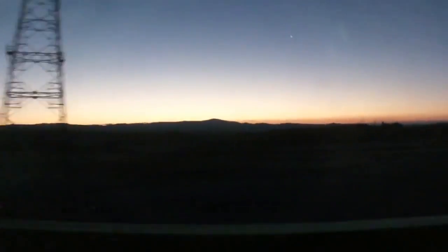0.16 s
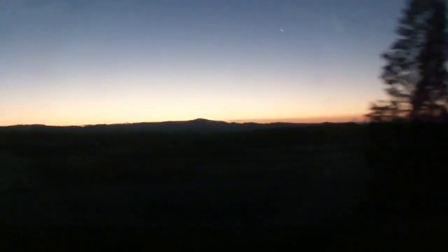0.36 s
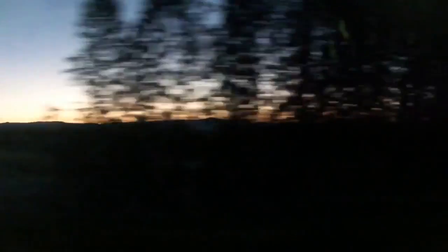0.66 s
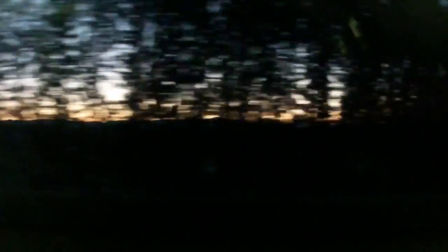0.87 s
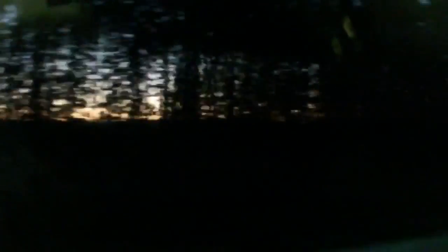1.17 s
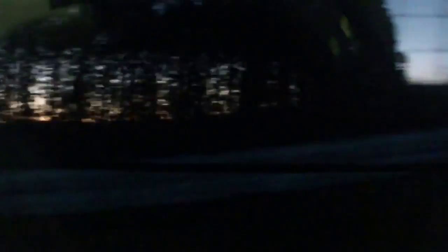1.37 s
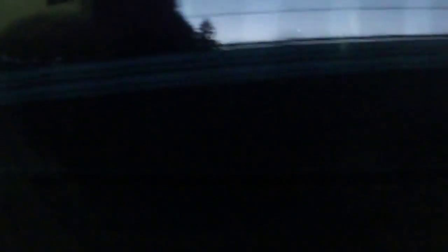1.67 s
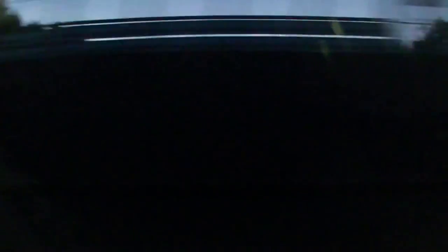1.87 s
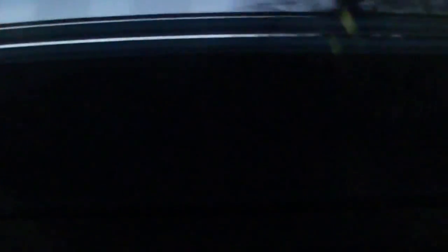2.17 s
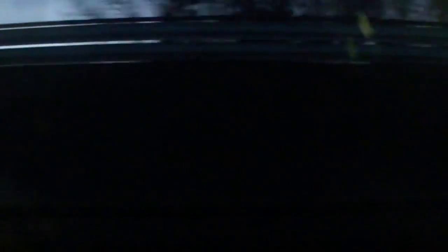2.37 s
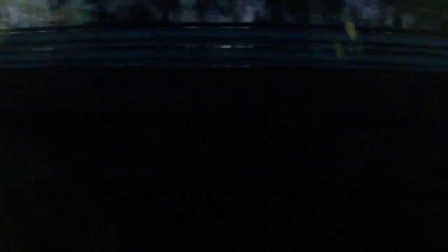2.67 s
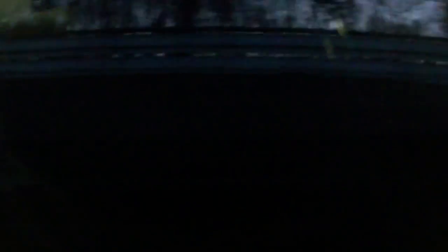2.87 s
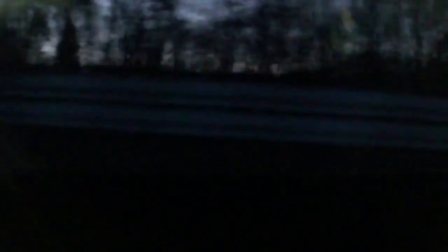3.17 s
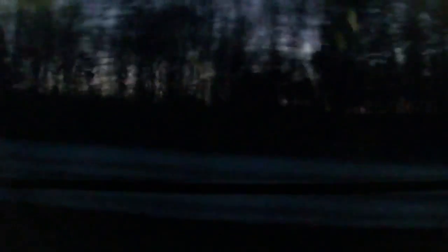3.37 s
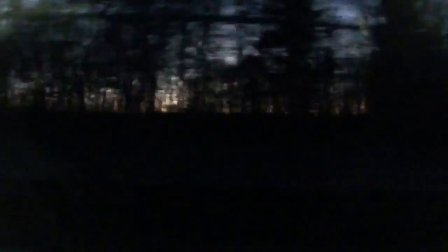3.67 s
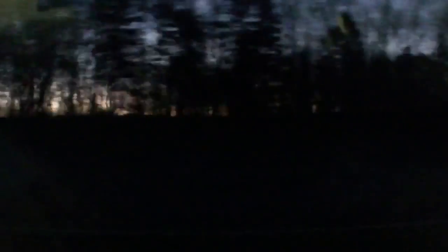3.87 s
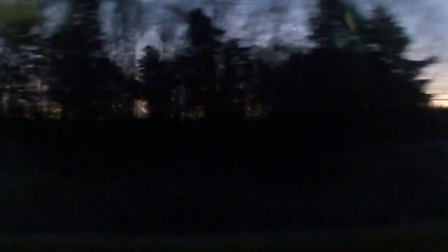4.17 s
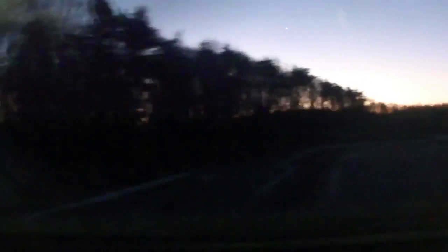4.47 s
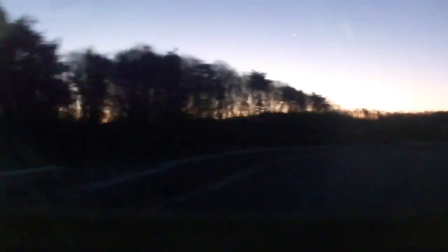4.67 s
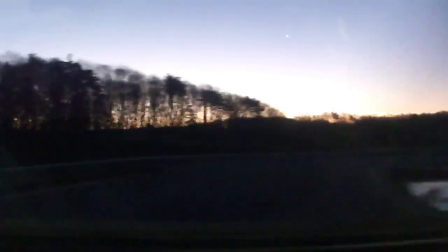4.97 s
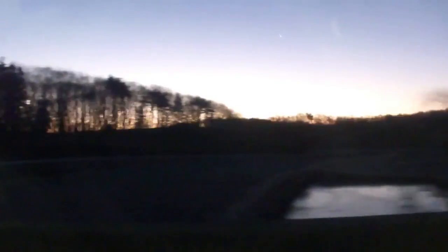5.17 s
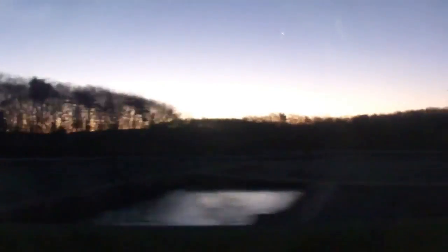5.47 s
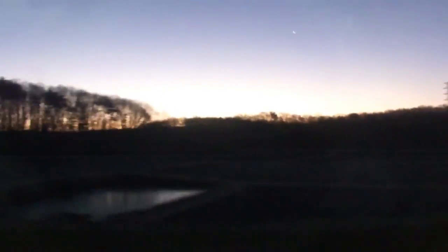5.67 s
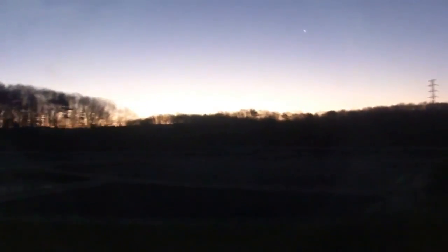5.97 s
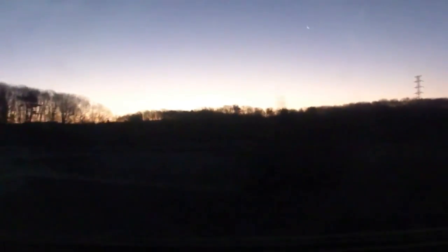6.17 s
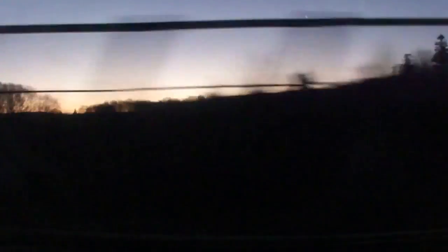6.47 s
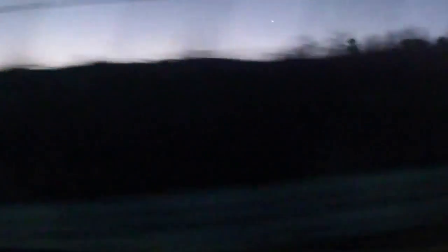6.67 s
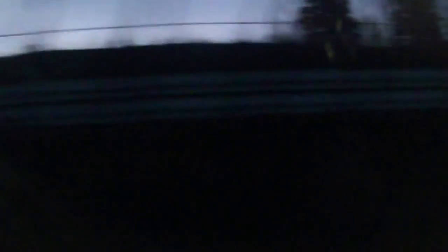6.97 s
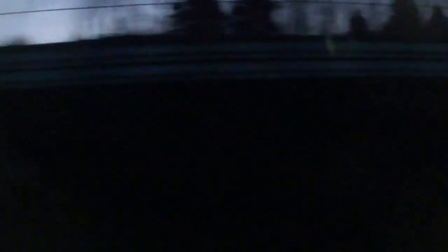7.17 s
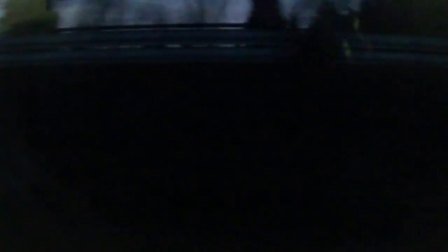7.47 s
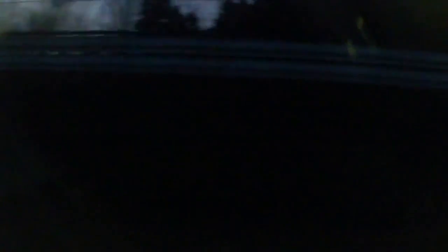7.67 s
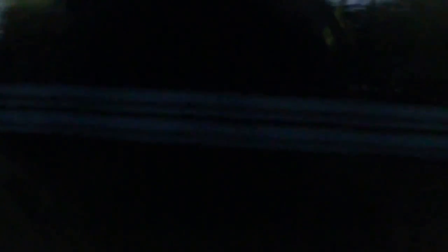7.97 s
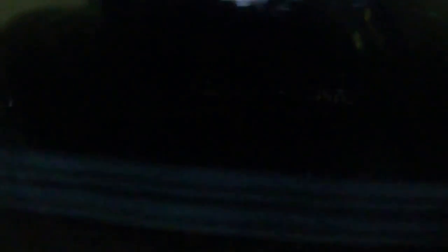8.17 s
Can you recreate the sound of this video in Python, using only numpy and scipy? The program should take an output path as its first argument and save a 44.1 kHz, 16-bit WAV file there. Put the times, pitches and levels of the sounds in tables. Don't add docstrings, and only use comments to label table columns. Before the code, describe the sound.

Inside a fast train carriage, close to the window. A dense, steady rumble fills the cabin, with muffled rail roar and slight whine above it and very faint air hiss. A mast swishes past at once, another soon after. A sharp plastic tap on the recorder case follows, then small rattles. Later the roar swells with several more mast swishes, a dull tick sounds, and the roar rises again.

```python
import sys
import numpy as np
from scipy import signal
from scipy.fft import rfft, irfft
from scipy.io import wavfile

SR = 44100
rng = np.random.default_rng(int(sys.argv[2]) if len(sys.argv) > 2 else 0)


def boost_factor(decibels):
    exponent = np.asarray(decibels, float) / 20
    return 10 ** exponent


def output_pcm(signal):
    pcm = np.clip(np.atleast_2d(signal).T, -1, 1) * 32767
    wavfile.write(sys.argv[1], SR, np.round(pcm).astype(np.int16))


N = 366471
HZ = np.fft.rfftfreq(N, 1 / SR) + 1e-3

# time_s, level_db
RAIL_ROUGHNESS = [(0.0, -35.5), (0.23, -37.5), (4.1, -39), (4.7, -35), (5.92, -34), (6.06, -35),
                  (6.69, -37.5), (7.41, -35), (8.01, -36), (8.31, -35.5)]
# frequency_hz, density_db (per Hz)
BODY_SPECTRUM = [(15, -86.5), (25, -51.5), (50, -24), (86, -17), (111, -9), (138, -7.5), (169, -4.5),
                 (272, -3.5), (306, -2), (359, -5.5), (652, -10), (721, -10.5), (1840, -18.5), (2240, -19),
                 (2900, -29.5), (3770, -54), (6380, -120)]
# frequency_hz, width_hz, lift_db
CABIN_MODES = [(124.5, 24.6, 6), (168.8, 11.7, 8), (226.6, 59, 4), (308.5, 18, 2), (466, 74, 3),
               (565, 26, 3), (719, 50, 2.5), (985, 44, 2.5)]
# frequency_hz, density_db (per Hz)
ROAR_SPECTRUM = [(700, -2.5), (1200, 4), (1600, -2), (1800, -5.5), (2050, -7), (2400, -9.5), (2600, -13.5),
                 (2790, -17.5), (2950, -31.5), (3300, -56.5), (4500, -100)]
# frequency_hz, density_db (per Hz)
ROAR_TOP_SPECTRUM = [(2700, -15.5), (3200, -1), (3600, -4.5), (4100, -11.5), (4600, -9.5), (5200, -20),
                     (6000, -38.5)]
# frequency_hz, width_hz, level_db
RAIL_MODES = [(2190, 110, 0), (2385, 110, -4), (1595, 80, -3)]
# frequency_hz, density_db (per Hz)
AIR_SPECTRUM = [(4000, -30.5), (4700, -6.5), (5600, 3), (6500, 2), (7900, -1), (8300, -5), (9500, -8),
                (10500, -13.5), (11300, -28.5), (13500, -36), (15000, -25.5), (15700, -15), (16000, -45)]
# centre_s, level_db, half_length_s
MASTS = [
    (0.048, -27.5, 0.039),
    (0.686, -32.5, 0.04),
    (1.998, -43, .03),
    (3.092, -43.5, 0.06),
    (4.626, -33.5, 0.12),
    (5.156, -28, 0.03),
    (5.732, -33, .06),
    (6.08, -43.5, 0.059),
]
# frequency_hz, density_db (per Hz)
MAST_SPECTRUM = [(700, -23), (1100, -5), (1700, -5), (2450, 3.5), (2900, -21.5), (3400, -15.5), (4500, -29),
                 (5500, -55)]
# start_s, peak_db
TAPS = [
    (1.231, -1.5),
]
# frequency_hz, left_db, right_db, t60_s
CASE_MODES = [(1640, -11.5, -22, 0.026), (2080, -15.5, -19.5, 0.015), (6170, -8, -13.5, 0.0024),
              (7000, -2, -11.5, 0.0048), (7940, -2, -1.5, 0.0025), (8900, -3.5, -15.5, .0045),
              (10300, -5.5, -16, 0.0032), (15600, -23, -20.5, .004)]
# start_s, peak_db, centre_hz
RATTLE_EVENTS = [(.155, -47, 6300), (.3015, -44, 6300), (.9292, -42, 6700), (1.2306, -33.5, 7800),
                 (1.2316, -22, 1300), (1.566, -34.5, 7400), (1.99, -48, 6800), (2.005, -48, 7600),
                 (2.36, -48, 7000), (3.6, -47.5, 8000), (4.18, -52, 6200), (4.258, -47, 8000),
                 (4.315, -33, 8540), (4.3172, -25.5, 6600), (4.3173, -22.5, 2000), (4.669, -38.5, 7700),
                 (4.867, -45.5, 7950), (4.879, -47, 7500), (5.9622, -41.5, 7950), (6.885, -44.5, 7100),
                 (6.93, -47, 7000)]
# start_s, peak_db, dullness (0-1)
TICK_EVENTS = [
    (.584, -48, .1),
    (.738, -45, .1),
    (1.2278, -38, .1),
    (1.4075, -44, .1),
    (1.9327, -44, .1),
    (2.162, -44, .1),
    (2.3268, -44, .1),
    (4.8093, -34, .1),
    (6.5096, -43, .1),
    (6.6938, -22, .85),
]
# frequency_hz, likeness (0-1)
CAPSULE_LIKENESS = [(30, 1), (125, 0.99), (250, 1), (500, 0.97), (1000, 0.93), (2000, 0.8), (3000, 0.61),
                    (5000, 0.62), (9000, 0.14), (12000, 0.1), (15500, .3)]
# frequency_hz, width_hz
GRILLE_DIPS = [(12000, 2800), (13700, 2800)]
# frequency_hz, width_hz
RECORDER_NOTCHES = [(3000, 267), (4000, 570), (5000, 840)]

SMOOTH_RAIL_DB, ROAR_LIFT_DB = -38, 2.0
RUMBLE_DB, RUMBLE_FOLLOWS = -22, 0.14
ROLLING_DB, ROLLING_FOLLOWS = -24.5, 0.56
HISS_DB, HISS_FOLLOWS = -56.5, 0.13
MAST_HISS_DB, MAST_HISS_TOP_HZ = -22.5, 7500
RATTLE_T60_S = 0.032
LEFT_DB = -0.55
CLOCK_HZ, CLOCK_DB = 8000, -76


def rms_one(x):
    return x / np.sqrt(np.mean(x ** 2) + 1e-20)


def at_hz(points):
    hz, db = np.array(points).T[:2]
    return np.interp(np.log(HZ), np.log(hz), db)


def hump(hz, width_hz):
    return 1 / (1 + (2 * (HZ - hz) / width_hz) ** 2)


def drift(rate_hz):
    pole = np.exp(-80 * np.pi * rate_hz / SR)
    chance = rng.standard_normal(N // 40 + 2002)
    slow = signal.lfilter([1], [1, -2 * pole, pole * pole], chance)[2000:]
    return np.interp(np.arange(N) / 40, np.arange(len(slow)), rms_one(slow))


def diffuse(gain):
    mid, side = rfft(rng.standard_normal((2, N)))
    alike = np.clip(at_hz(CAPSULE_LIKENESS), 0, 0.997)
    shared = np.sqrt(1 + alike) * mid
    opposed = np.sqrt(1 - alike) * side * [[1], [-1]]
    return irfft(gain * (shared + opposed), N)


def ring(clicks, hz, t60_s):
    pole, turn = boost_factor(-60 / (t60_s * SR)), 2 * np.pi * hz / SR
    return signal.lfilter([0, np.sin(turn)], [1, -2 * pole * np.cos(turn), pole * pole], clicks)


def notched(x, dips, leak_db=-30):
    for hz, width_hz in dips:
        cut = signal.lfilter(*signal.iirnotch(hz, hz / width_hz, SR), x)
        x = cut + boost_factor(leak_db) * (x - cut)
    return x


def running_gear(rumble_db, rolling_db, roar_db, low_hz=400, high_hz=1500):
    cabin_db = sum(lift_db * hump(hz, width_hz) for hz, width_hz, lift_db in CABIN_MODES)
    body = boost_factor(at_hz(BODY_SPECTRUM) + cabin_db)
    low = 1 / (1 + (HZ / low_hz) ** 4)
    high = 1 / (1 + (high_hz / HZ) ** 6)
    middle = np.clip(1 - low - high, 0, 1)
    layers = [(rumble_db, body * np.sqrt(low)),
              (rolling_db, body * np.sqrt(middle)),
              (roar_db, boost_factor(at_hz(ROAR_SPECTRUM)) * np.sqrt(high))]
    return sum(boost_factor(db + 1.0 + 0.81 * drift(7.7)) * rms_one(diffuse(colour)) for db, colour in layers)


def rail_whine(roar_db):
    colour = sum(boost_factor(db) * hump(hz, width_hz) for hz, width_hz, db in RAIL_MODES)
    level_db = 1.4 * (roar_db + 32) - 39
    return boost_factor(level_db + 1.7 * drift(5.5)) * rms_one(diffuse(colour))


def air(hiss_db, roar_db):
    t = np.arange(N) / SR
    air_colour = boost_factor(at_hz(AIR_SPECTRUM))
    hiss = boost_factor(hiss_db + 0.99 * drift(22)) * rms_one(diffuse(air_colour))
    roar_top = boost_factor(0.81 * (roar_db + 37.0) - 60) * rms_one(diffuse(boost_factor(at_hz(ROAR_TOP_SPECTRUM))))
    swell = sum(boost_factor(db) * np.exp(-((t - centre_s) / half_s) ** 2) for centre_s, db, half_s in MASTS)
    mast_roar = rms_one(diffuse(boost_factor(at_hz(MAST_SPECTRUM))))
    mast_hiss = rms_one(diffuse(air_colour / (1 + (HZ / MAST_HISS_TOP_HZ) ** 6)))
    return hiss + roar_top + swell * (mast_roar + boost_factor(MAST_HISS_DB) * mast_hiss)


def case_taps(bounce_s=0.0012, bounce_db=-12):
    clicks = np.zeros(2000)
    clicks[[0, round(bounce_s * SR)]] = 1, boost_factor(bounce_db)
    out = np.zeros((2, N))
    for start_s, peak_db in TAPS:
        i = round(start_s * SR)
        for k, (hz, left_db, right_db, t60_s) in enumerate(CASE_MODES):
            sign = (-1) ** k
            gains = sign * boost_factor(peak_db - 1 + np.array([[left_db], [right_db]]))
            out[:, i:i + len(clicks)] += gains * ring(clicks, hz, t60_s)
    return out


def rattles(width=0.48, rise_s=0.00048):
    t = np.arange(4000) / SR
    fade = (1 - np.exp(-t / rise_s)) * boost_factor(-60 * t / RATTLE_T60_S)
    out = np.zeros((2, N + len(t)))
    for start_s, peak_db, hz in RATTLE_EVENTS:
        shared, left, right = rng.standard_normal((3, len(t)))
        edges_hz = [hz * (1 - width / 2), hz * (1 + width / 2)]
        band = signal.butter(2, edges_hz, "band", fs=SR, output="sos")
        grit = signal.sosfilt(band, shared + 0.89 * np.array([left, right]))
        i = round(start_s * SR)
        out[:, i:i + len(t)] += boost_factor(peak_db - 1.5) * rms_one(grit) * fade
    return out[:, :N]


def ticks():
    out = np.zeros((2, N + 40))
    for start_s, peak_db, dullness in TICK_EVENTS:
        i = round(start_s * SR)
        decay = np.clip(dullness, 0, 1) ** np.arange(40)
        out[:, i:i + 40] += boost_factor(peak_db) * decay * [[1], [0.6]]
    return out[:, :N]


def clock_tone():
    return boost_factor(CLOCK_DB) * np.sin(2 * np.pi * CLOCK_HZ * np.arange(N) / SR) * [[1], [-1]]


def scene():
    time_s, level_db = np.transpose(RAIL_ROUGHNESS)
    rough_db = np.interp(np.arange(N) / SR, time_s, level_db)
    swing_db = rough_db - SMOOTH_RAIL_DB
    roar_db = rough_db + ROAR_LIFT_DB
    rumble_db = RUMBLE_DB + RUMBLE_FOLLOWS * swing_db
    rolling_db = ROLLING_DB + ROLLING_FOLLOWS * swing_db
    train = running_gear(rumble_db, rolling_db, roar_db) + rail_whine(roar_db)
    train = train + air(HISS_DB + HISS_FOLLOWS * swing_db, roar_db)
    handling = rattles() + case_taps() + 1e-18
    return train + notched(handling, GRILLE_DIPS)


def band_limit(x):
    return signal.sosfilt(signal.butter(12, 15830, fs=SR, output="sos"), x)


def record(dry):
    balanced = dry * [[boost_factor(LEFT_DB)], [1]]
    mix = notched(balanced, RECORDER_NOTCHES) + ticks() + clock_tone()
    return band_limit(mix)


dry = scene()
out = record(dry)
output_pcm(out)
```